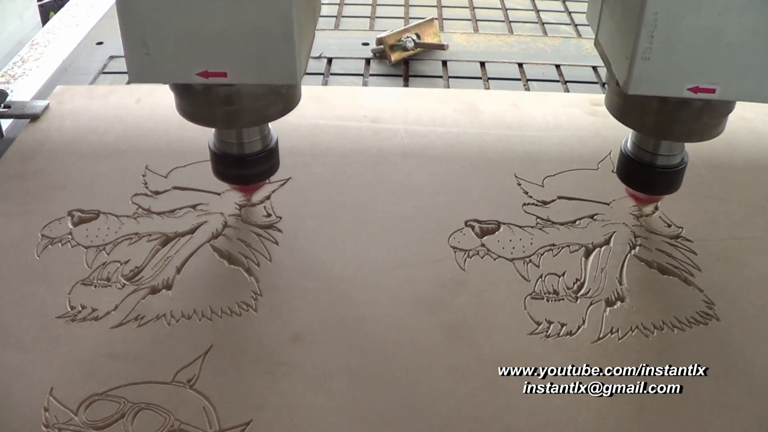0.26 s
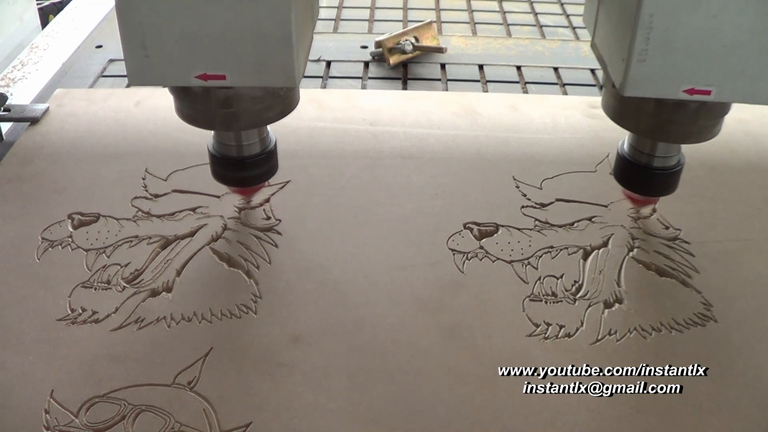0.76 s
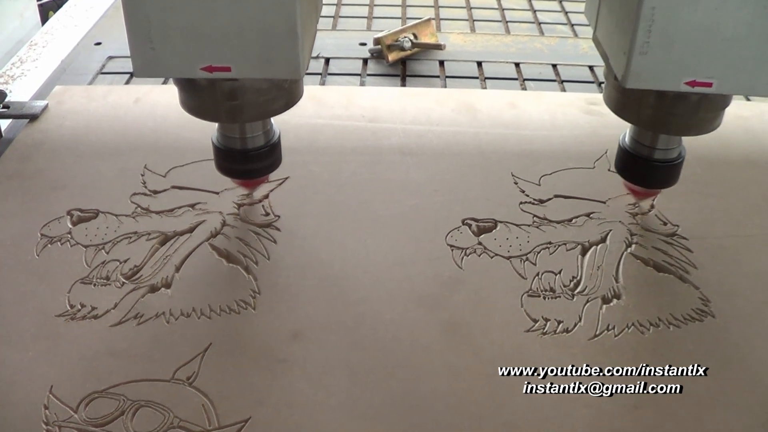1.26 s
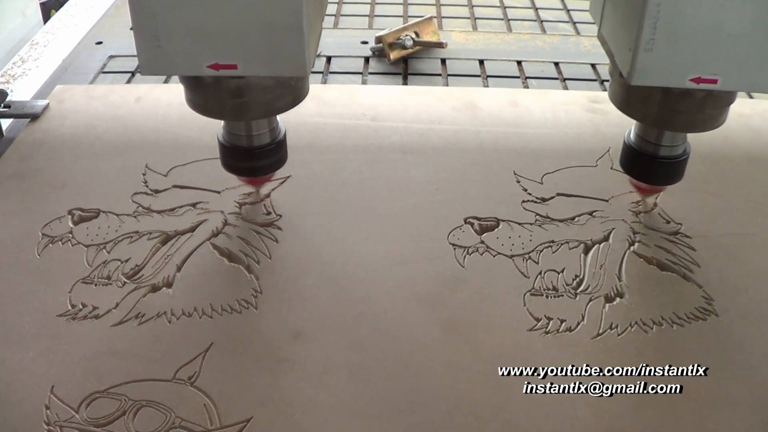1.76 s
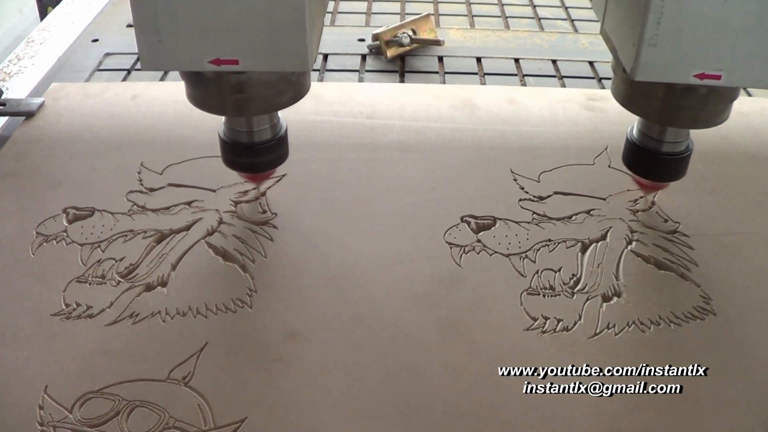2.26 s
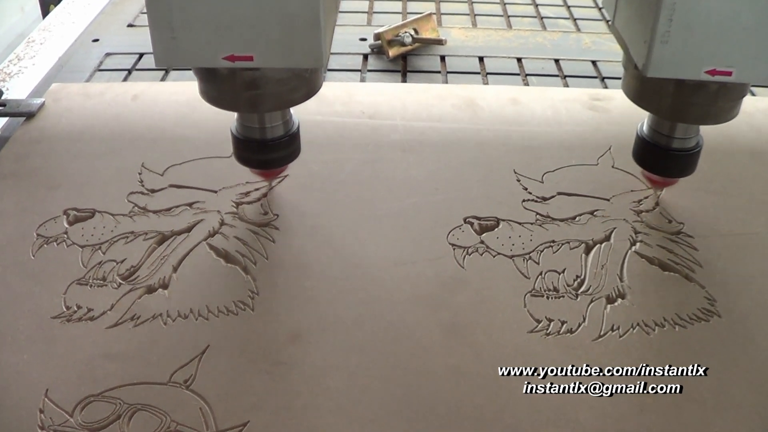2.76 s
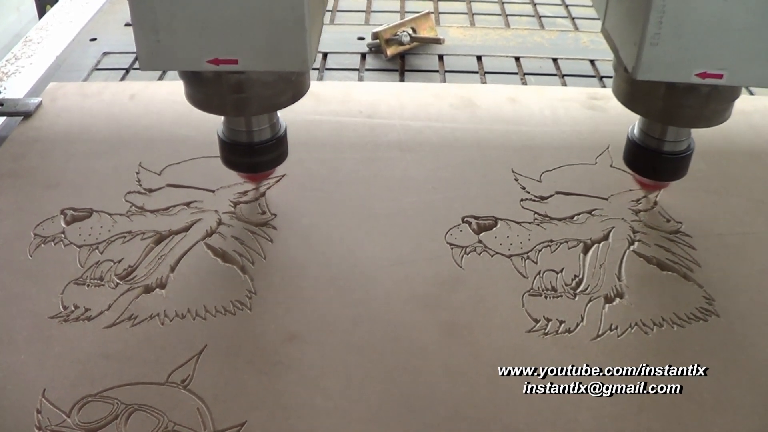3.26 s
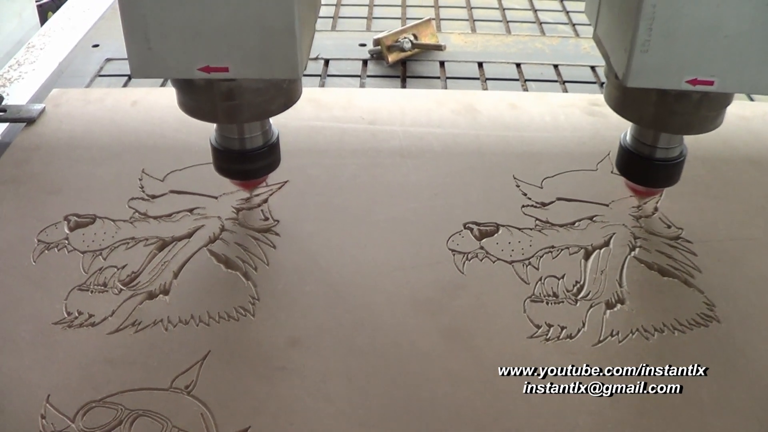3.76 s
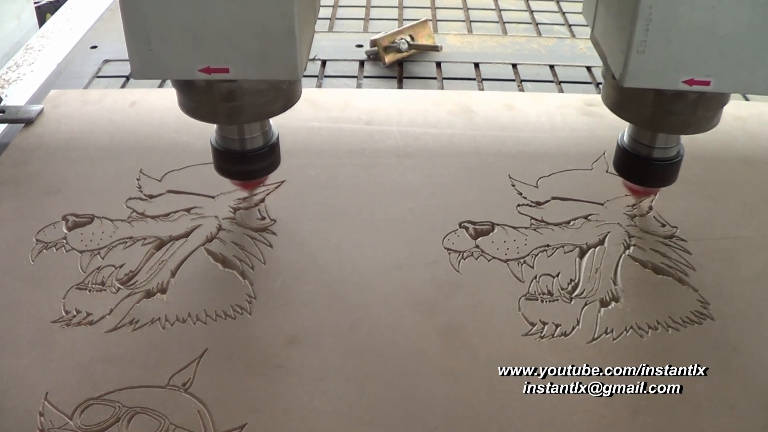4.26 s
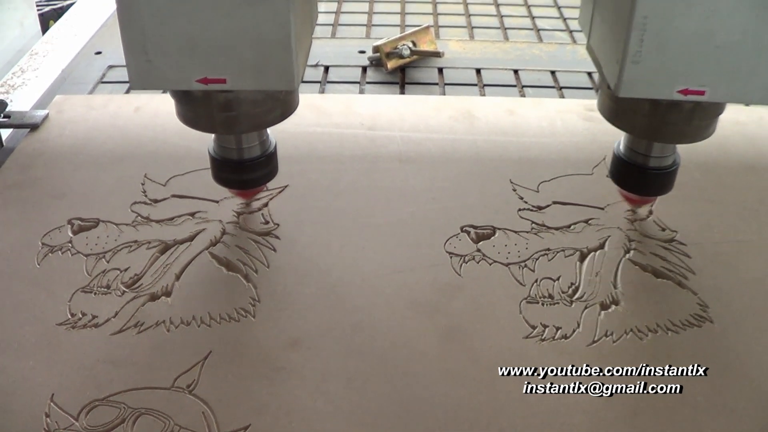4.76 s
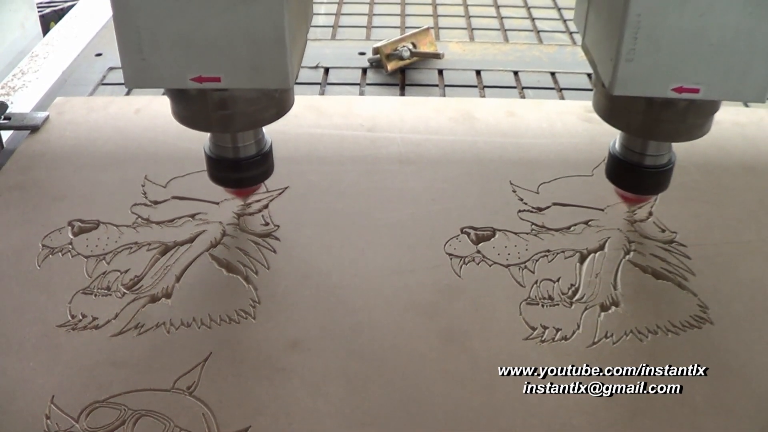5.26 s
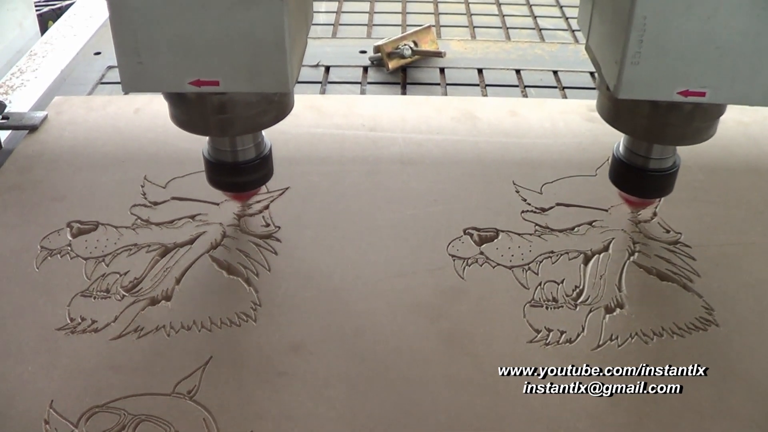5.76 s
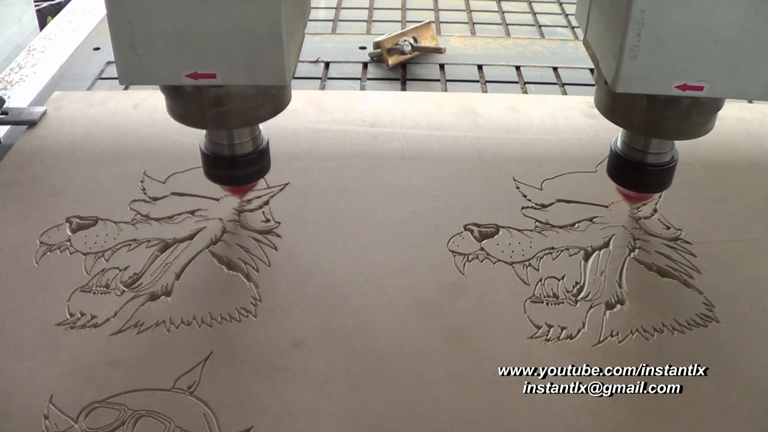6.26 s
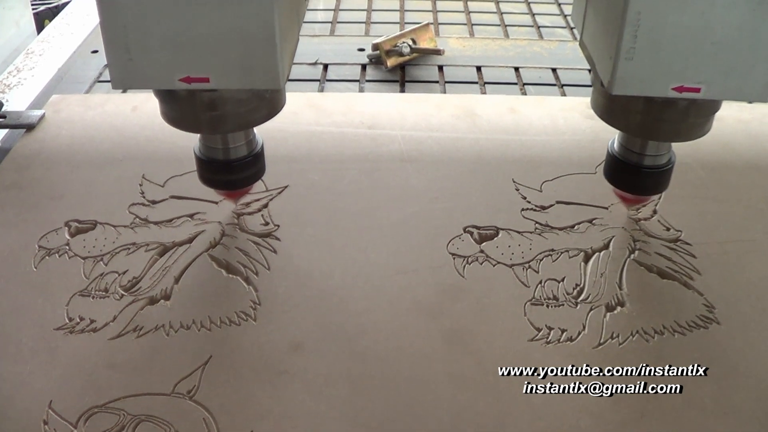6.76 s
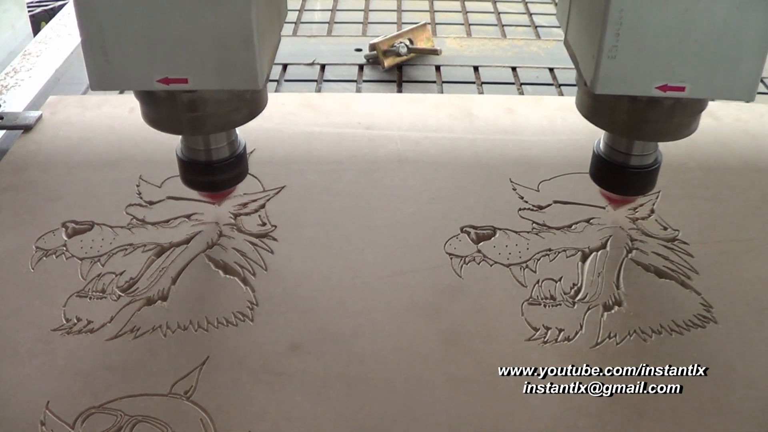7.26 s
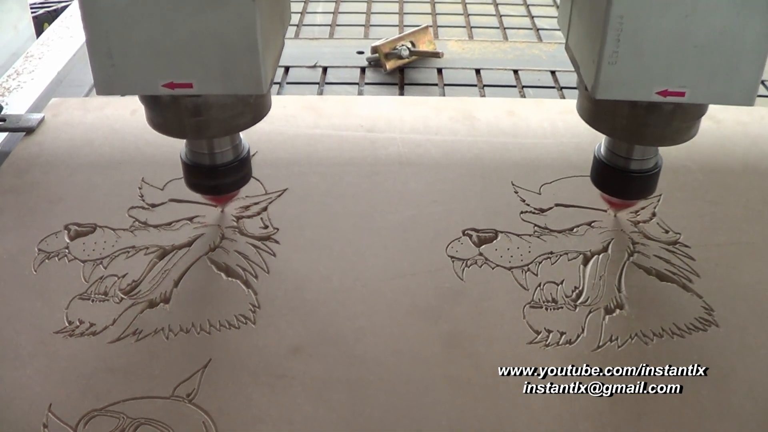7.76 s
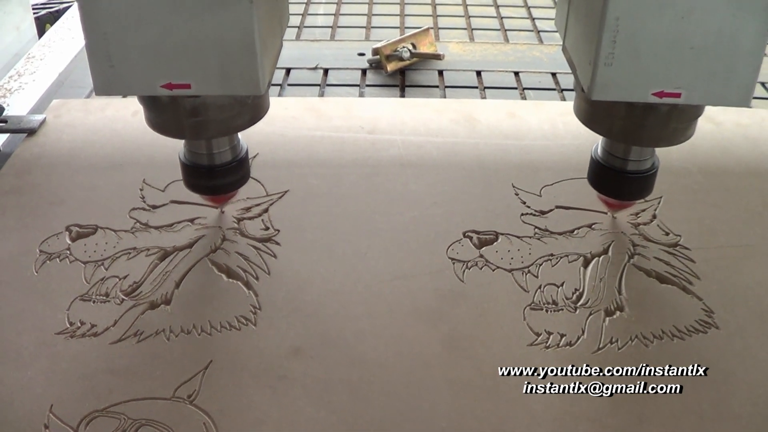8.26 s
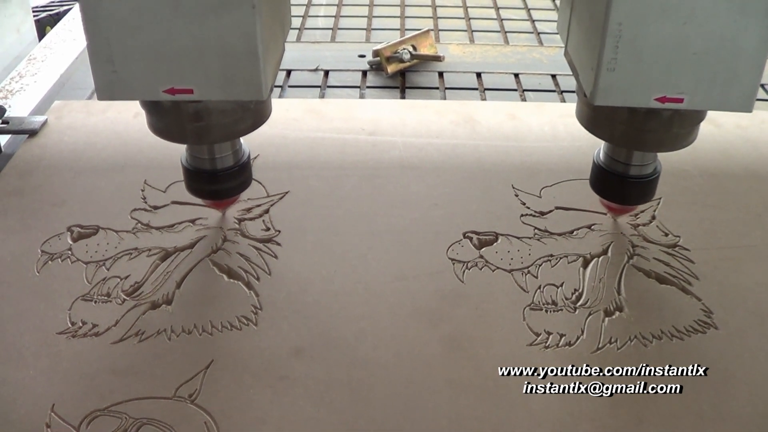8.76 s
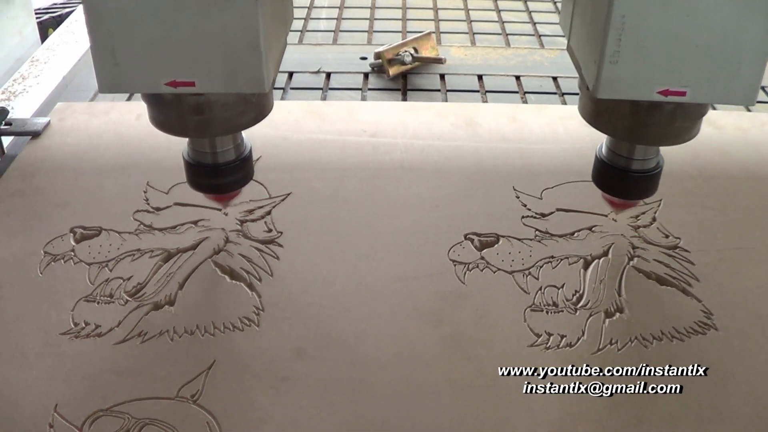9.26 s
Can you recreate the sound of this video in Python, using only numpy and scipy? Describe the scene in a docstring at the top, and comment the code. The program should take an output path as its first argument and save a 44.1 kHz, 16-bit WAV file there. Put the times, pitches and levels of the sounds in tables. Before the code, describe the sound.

A computer-controlled router engraves a board with a loud, steady rush of air and a high whine, briefly cutting out early on.

```python
"""CNC router engraving a board.

Two spindles turn at about 18000 rpm, close by. Cooling air and fine cutting rush through the housing
resonances. The shaft tones beat slowly against each other beside the inverter whistle.
Early on the sound drops out for half a second."""
import sys
import numpy as np
from scipy import signal
from scipy.fft import rfft, irfft
from scipy.io import wavfile
from scipy.ndimage import uniform_filter1d

SR = 44100
rng = np.random.default_rng(int(sys.argv[2]) if len(sys.argv) > 2 else 0)


def generate_wav(sig):
    """Save sig (samples, or channels by samples) to the path in sys.argv[1] as 16-bit PCM at SR."""
    pcm = np.round(np.clip(np.atleast_2d(sig).T, -1, 1) * 32767).astype(np.int16)
    wavfile.write(sys.argv[1], SR, pcm)


N = 418950
T = np.arange(N) / SR

SHAFT_HZ, SLIP_HZ = 299.78, 0.0795  # first spindle; second is faster by the slip
ANTIPHASE_S = 4.35  # beat minimum
BAND_EDGE_HZ = 10520

# silent gap: (start [s], end [s])
DROPOUT_S = (0.6195, 1.173)
# left-right coherence: (frequency [Hz], coherence [0..1])
COHERENCE = [(60, 0.62), (130, 0.62), (270, 0.85), (560, 0.94), (1200, 0.8), (2500, 0.87), (11000, 0.85)]
# left over right: (frequency [Hz], level [dB])
BALANCE_DB = [(60, 6), (170, 6.5), (300, 2), (610, -1.5), (1090, -2.5), (1700, -1.5), (2700, -3),
              (4300, -1.3), (6800, -0.1), (11000, 0.5)]
# left ahead of right: (frequency [Hz], phase [rad])
LEAD_RAD = [(0, 0.066), (520, 0.56), (1120, 0.095), (1380, 0.43), (2330, 0.1), (3360, 0.43), (3960, 0.064),
            (6800, 0.3), (11200, 0.08)]
# inverter whistle: (time [s], level [dB])
WHISTLE_DB = [(0, -47), (0.5, -32.5), (1.3, -40), (1.9, -36), (2.4, -52), (3.5, -34), (4.3, -44),
              (5.2, -34), (6.3, -36), (7.2, -35.5), (9.5, -37)]
# brief swells and dips of the shaft hum: (centre [s], width [s], gain [dB])
HUM_SWELLS_DB = [(1.68, 0.24, -6), (1.96, 0.4, 7), (2.53, 0.12, -10), (2.85, 0.33, 12.5), (3.45, 0.68, 5.5),
                 (3.81, 0.12, 10), (7.12, 0.72, 2), (7.53, 0.1, -10)]
# 2nd shaft order: (time [s], relative level [dB])
OCTAVE_DB = [(0.4, -34.5), (1.3, -40), (2.4, -38.5), (3.3, -43), (5.0, -39), (5.6, -44), (6.5, -38.5),
             (7.4, -54), (8.7, -35), (9.4, -45)]
# 6th shaft order: (time [s], relative level [dB])
WHINE_DB = [(0.1, -35.5), (0.6, -40), (2.5, -41.5), (3.8, -34.5), (4.4, -42), (5.3, -38.5), (7.2, -35.5),
            (8.4, -38.5), (9.5, -31.5)]
# orders from both spindles: (order [-], first spindle's level [dB], second/first amplitude [-])
BEATING_ORDERS = [(4, -52, 0.4), (5, -48.5, 0.5), (8, -47, 0.6), (12, -41.5, 0.65), (18, -45.5, 0.6),
                  (22, -38.5, 0.9), (24, -51, 0.6)]
# gantry shudders or settles on course changes: (centre [s], width [s], rumble gain [dB])
JOLTS_DB = [(0.4, 0.12, 6.5), (2.3, 0.22, 2), (3.56, 0.08, 7.5), (4.15, 0.16, 8.5), (4.53, 0.08, 7),
            (4.65, 0.1, -7.5), (5.39, 0.1, 11.5), (5.87, 0.08, 10.5), (6.02, 0.07, 4.5), (6.9, 0.22, 6.5),
            (7.5, 0.25, -5.5), (7.68, 0.11, 4), (7.84, 0.11, 7.5), (7.99, 0.08, 12), (8.28, 0.08, 2.5),
            (8.7, 0.35, 3), (9.28, 0.12, 5)]
# head travel over the board: (time [s], offset [arbitrary])
HEAD_OFFSET = [(0, -1.5), (0.45, -1), (1.4, 0.1), (2.6, 1.1), (3.6, 0), (4.2, -0.1), (5.7, 0), (6.1, -1),
               (6.5, 0.5), (6.9, -2.3), (7.2, -3.5), (7.4, -2), (7.7, -0.9), (8.9, -1.7), (9.2, -2),
               (9.5, -3)]
# bands where the board's reflection adds or cancels: (centre [Hz], width [Hz], gain [dB/unit offset])
BOARD_REFLECTION = [(1400, 300, 0.5), (1950, 500, -0.7), (3600, 550, 0.5), (4280, 200, 1.0),
                    (4750, 450, -0.4), (5350, 260, -0.7), (6300, 450, 1.2), (7150, 450, -0.9),
                    (9400, 500, -0.6)]
# resonances and notches of housings and gantry: (centre [Hz], width [Hz], gain [dB])
HOUSING_DB = [(95, 29, 2.5), (119.2, 42, 14), (160, 25, -2), (195.4, 14, 7), (544, 95, 6.5),
              (760, 254, 5.5), (1019, 184, 5.5), (1557, 90, -5), (1594, 31, 8), (1806, 230, 7.5),
              (2126, 140, 5.5), (2386, 38, 3.5), (2430, 427, 10.5), (3057, 352, 11.5), (3349, 310, 7.5),
              (3743, 466, 6), (4110, 140, 2.5), (4410, 177, -7), (4754, 610, 5.5), (5900, 670, 0.6),
              (6660, 420, -1.1), (7070, 293, 2), (7250, 153, -4.5), (7630, 180, 1.5)]
# air and cutting noise: (frequency [Hz], relative density [dB])
RUSH_SPECTRUM_DB = [(25, -27.5), (45, -26.5), (80, -16.5), (160, -19), (230, -11), (420, -7.5), (650, -1),
                    (1300, -2.5), (2800, -5.5), (4400, -0.57), (6500, 0.3), (8200, -1), (9300, -7.5),
                    (10400, -6.5)]


def amp(db):
    """Decibels to gain."""
    return 10 ** (np.asarray(db) / 20)


def unit_rms(x):
    """Scale to rms 1."""
    return x / np.sqrt(np.mean(abs(x) ** 2) + 1e-20)


def over_time(rows, t):
    """Interpolate (time, value) rows linearly."""
    return np.interp(t, *np.transpose(rows))


def over_log_hz(rows, hz):
    """Interpolate (frequency, value) rows on a log axis."""
    row_hz, values = np.transpose(rows)
    return np.interp(np.log(hz + 1), np.log(row_hz + 1), values)


def bells(rows, x):
    """Sum of Gaussian (centre, width, height) peaks."""
    return sum(height * np.exp(-(2 * (x - centre) / width) ** 2) for centre, width, height in rows)


def drift(rate_hz):
    """Slow zero-mean noise, rms 1."""
    hz = np.fft.rfftfreq(N, 1 / SR)
    lowpass = np.exp(-(hz / rate_hz) ** 2) * (hz > 0)
    return unit_rms(irfft(rfft(rng.standard_normal(N)) * lowpass, N))


def stereo_gain(hz):
    """Complex left and right gain per frequency."""
    left = amp(over_log_hz(BALANCE_DB, hz) / 2) * np.exp(0.5j * over_log_hz(LEAD_RAD, hz))
    return np.array([left, 1 / left]).reshape(2, -1)


def tone(hz, cycles, waver=0.12):
    """Stereo sine; workshop scatter makes it waver."""
    scatter = waver * (drift(rate_hz=6) + 1j * drift(rate_hz=5))
    return np.sqrt(2) * (stereo_gain(hz) * (1 + scatter) * np.exp(2j * np.pi * cycles)).real


def inverter_whistle(switching_hz=4000):
    """Windings sing at the switching rate less twice the drive frequency."""
    hz = switching_hz - 2 * round(SHAFT_HZ)
    return amp(over_time(WHISTLE_DB, T)) * tone(hz, hz * T)


def shaft_tones(hum_db=-39.5, second_share=0.62, uneven_load=0.15, trim_db=-0.3):
    """Unbalance, fan blades and motor slots give shaft orders; higher ones beat faster."""
    first_turns = SHAFT_HZ * T + 0.009 * drift(rate_hz=1.1)
    second_turns = first_turns + SLIP_HZ * (T - ANTIPHASE_S)
    loaded_share = second_share + uneven_load * drift(rate_hz=10)
    beat = abs(1 - loaded_share * np.exp(2j * np.pi * (second_turns - first_turns)))
    tones = amp(hum_db + bells(HUM_SWELLS_DB, T)) * beat * tone(SHAFT_HZ, first_turns)
    for order, levels in ((2, OCTAVE_DB), (6, WHINE_DB)):
        gain = amp(over_time(levels, T) + trim_db)
        tones += gain * tone(order * SHAFT_HZ, order * first_turns, waver=0.32)
    for order, level_db, share in BEATING_ORDERS:
        first = tone(order * SHAFT_HZ, order * first_turns)
        second = tone(order * SHAFT_HZ, order * second_turns, waver=0.1)
        tones += amp(level_db) * (first - share * second)
    return tones


def gantry_rumble_db(hz, t, centre_hz=104.8, width_hz=110, rest_db=-2, shake_db=0.5):
    """Gantry shake modulates the bass of the rush."""
    gain_db = rest_db + bells(JOLTS_DB, t) + shake_db * np.interp(t, T, drift(rate_hz=8))
    return np.outer(bells([(centre_hz, width_hz, 1)], hz), gain_db)


def cutter_load_db(hz, t, centre_hz=5000, width_hz=16000, depth_db=-0.04):
    """Uneven cutter load faintly modulates a wide treble band."""
    load = np.interp(t, T, drift(rate_hz=8.5))
    return np.outer(bells([(centre_hz, width_hz, depth_db)], hz), load)


def chips(rate_hz=5000, spread_db=2.5):
    """Cutters tear the board in a dense stream of tiny fractures."""
    size = amp(spread_db * np.minimum(rng.exponential(1, N), 3))
    polarity = rng.choice([-1, 1], N)
    fractures = rng.random(N) < rate_hz / SR
    return unit_rms(size * polarity * fractures)


def rush(level_db=-17.5, chips_db=-11, flutter_db=0.48, patch_db=0.6):
    """Turbulent air and chips sound through the housings; the colour shifts with head travel."""
    source = unit_rms(rng.standard_normal(N) + amp(chips_db) * chips())
    source *= amp(flutter_db * drift(rate_hz=33))
    framing = dict(fs=SR, nperseg=4096, noverlap=3072)
    hz, t, (direct, *diffuse) = signal.stft([source, *rng.standard_normal((2, N))], **framing)
    coherence = over_log_hz(COHERENCE, hz)[:, None]
    stereo = stereo_gain(hz)[:, :, None]
    spectra = np.sqrt(coherence) * direct * stereo
    spectra += np.sqrt(1 - coherence) * np.array(diffuse) * abs(stereo)  # workshop reverberation

    colour_db = (over_log_hz(RUSH_SPECTRUM_DB, hz) + bells(HOUSING_DB, hz))[:, None]
    colour_db = colour_db + np.outer(bells(BOARD_REFLECTION, hz), over_time(HEAD_OFFSET, t))
    patches = uniform_filter1d(rng.standard_normal(colour_db.shape), size=40, axis=0)  # bins
    patches = uniform_filter1d(patches, size=4, axis=1)  # frames
    colour_db += patch_db * unit_rms(patches) + gantry_rumble_db(hz, t) + cutter_load_db(hz, t)
    in_band = (hz < BAND_EDGE_HZ + 200)[:, None]
    sound = signal.istft(spectra * amp(colour_db) * in_band, **framing)[1][:, :N]
    return amp(level_db) * sound / np.std(sound.mean(0))


def scene():
    """Rush, shaft tones and whistle, in stereo."""
    return rush() + shaft_tones() + inverter_whistle()


def record(dry):
    """Abrupt dropout with a faint fringe inside each edge, then low-pass."""
    fringe_db, fringe_s = -19, 0.037
    inside_s = np.minimum(T - DROPOUT_S[0], DROPOUT_S[1] - T)
    fringe = amp(fringe_db) * np.clip(1 - inside_s / fringe_s, 0, 1)
    gated = dry * np.where(inside_s > 0, fringe, 1)
    lowpass = signal.firwin(1023, BAND_EDGE_HZ, window=("kaiser", 9), fs=SR)
    return signal.oaconvolve(gated, lowpass[None], "same")


dry = scene()
out = record(dry)
generate_wav(out)
```